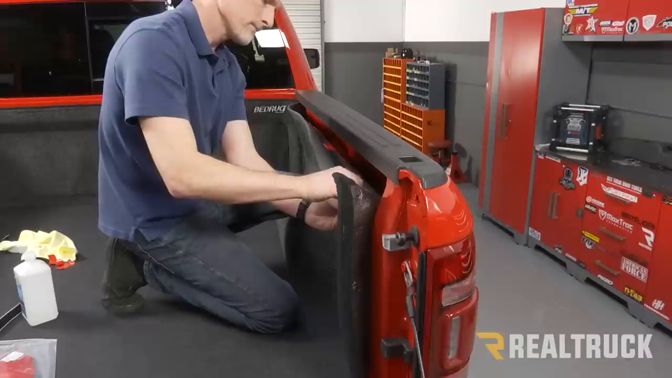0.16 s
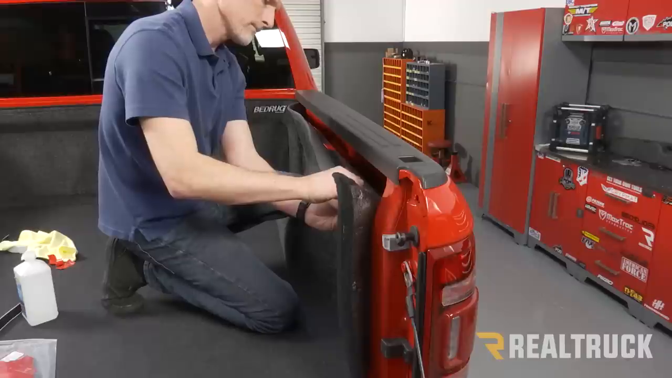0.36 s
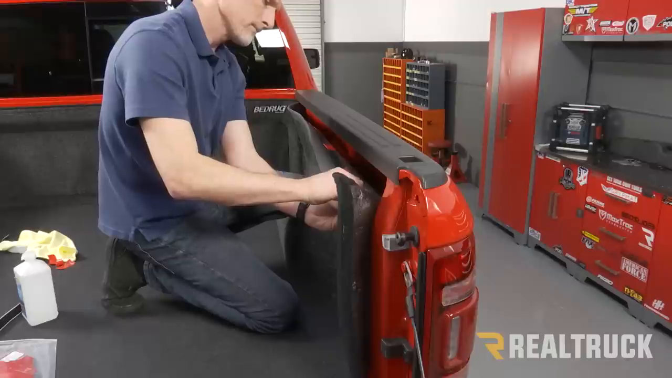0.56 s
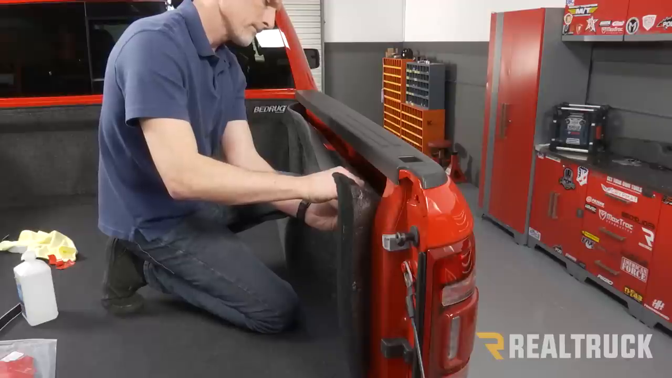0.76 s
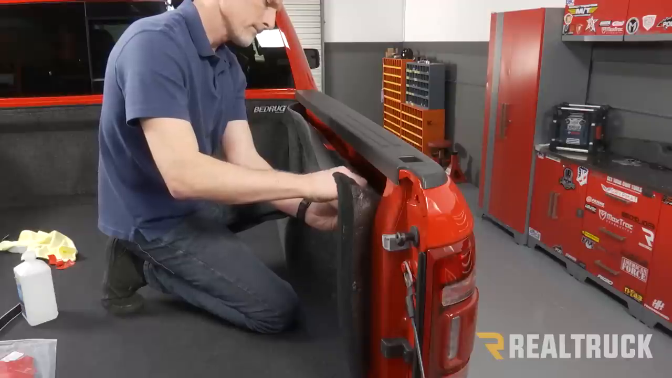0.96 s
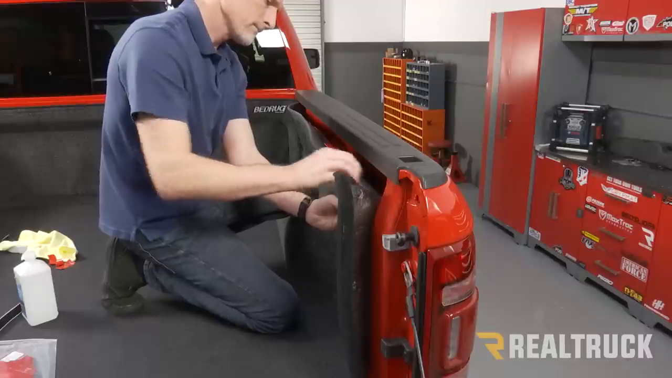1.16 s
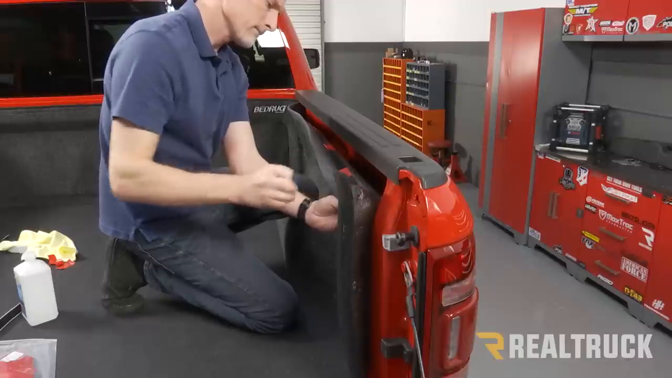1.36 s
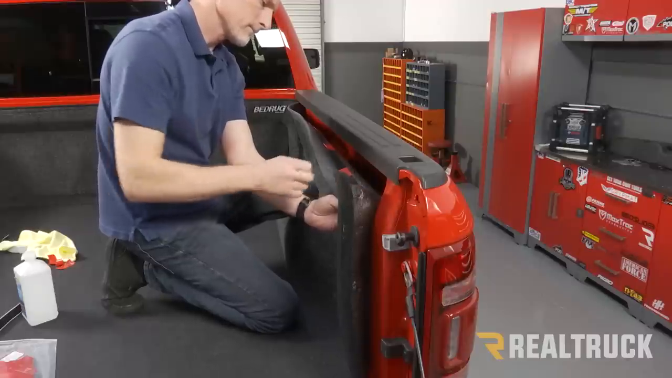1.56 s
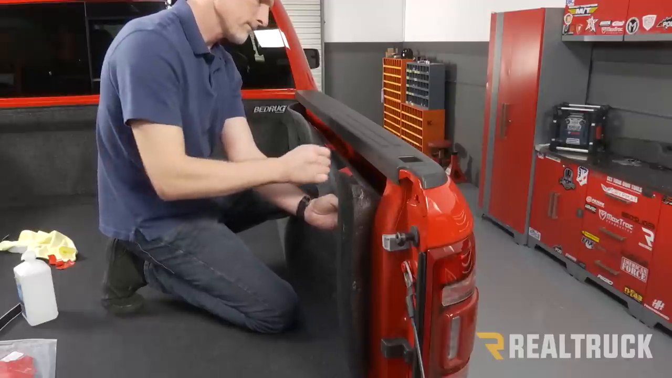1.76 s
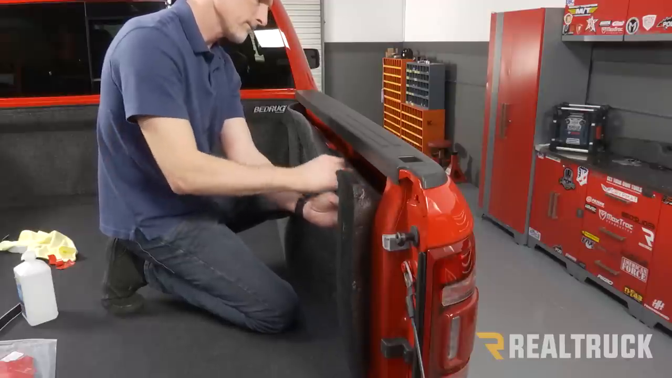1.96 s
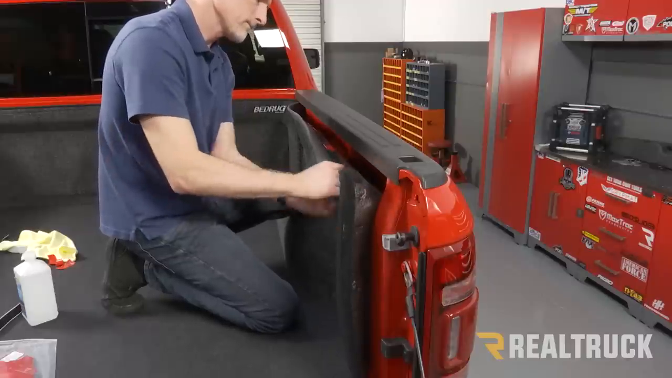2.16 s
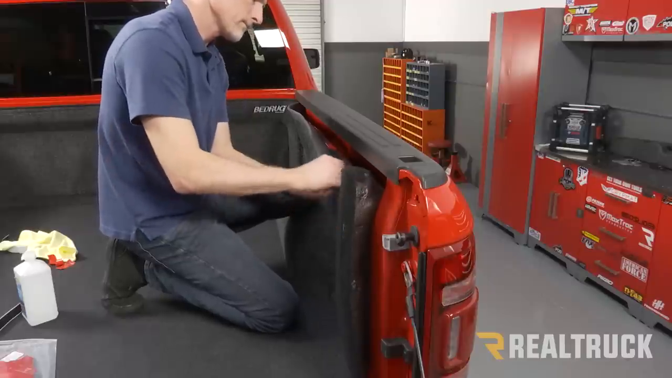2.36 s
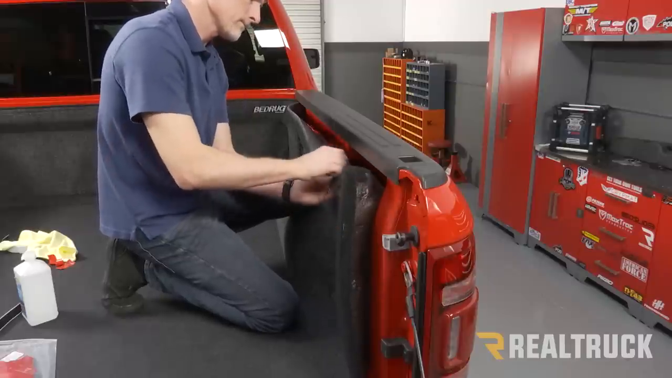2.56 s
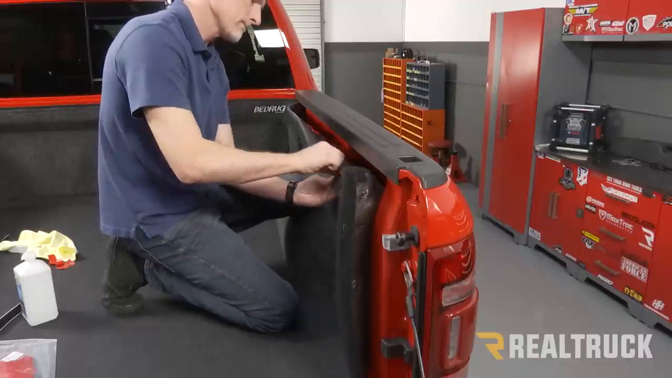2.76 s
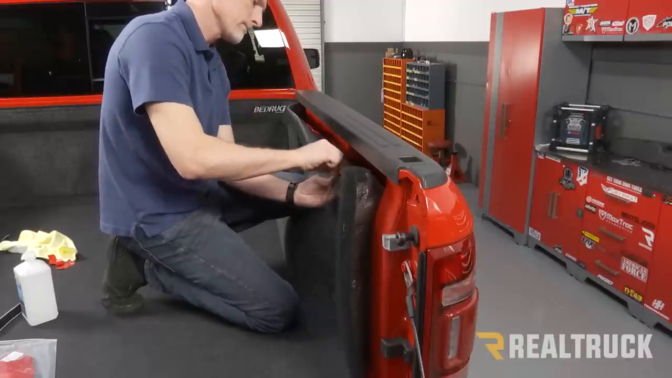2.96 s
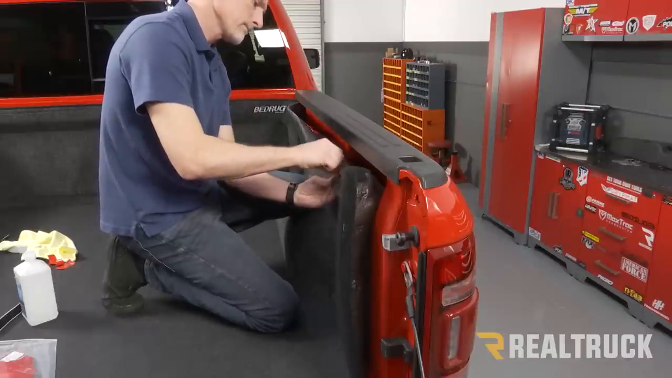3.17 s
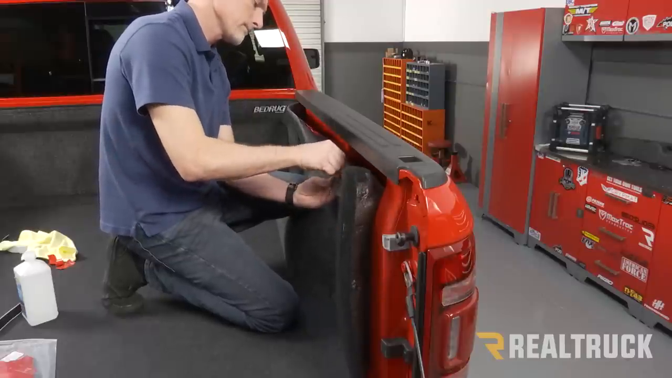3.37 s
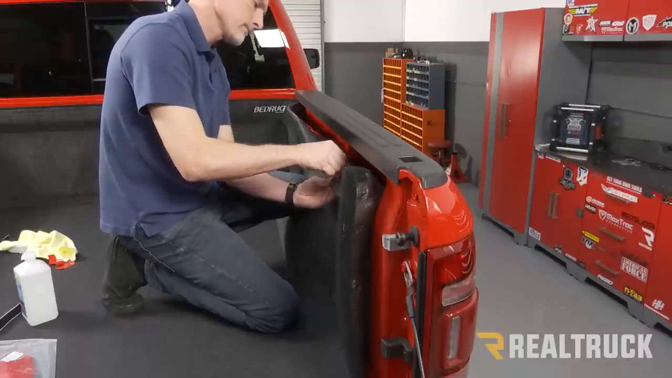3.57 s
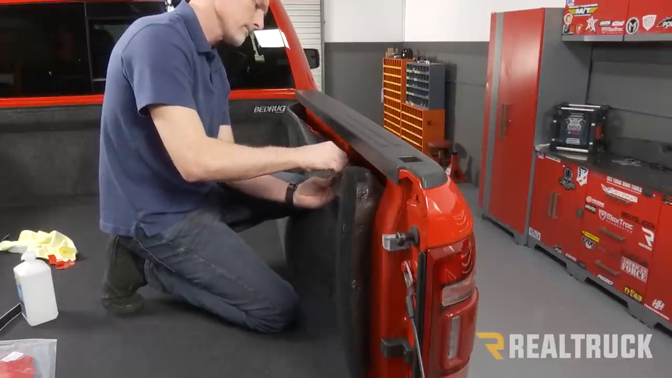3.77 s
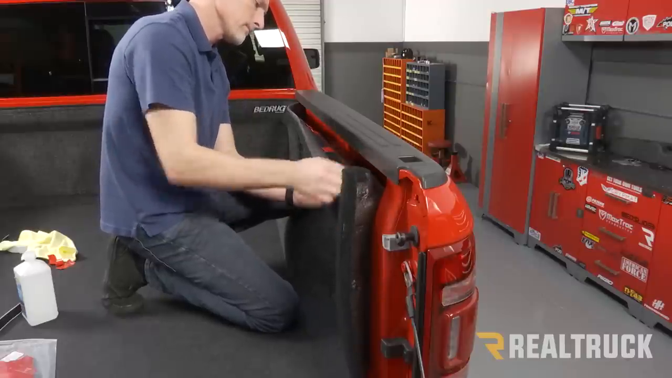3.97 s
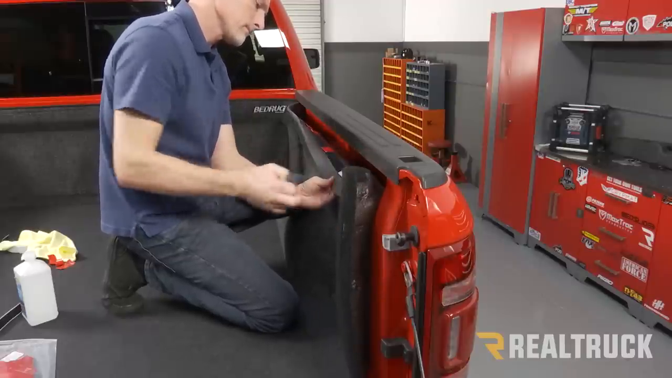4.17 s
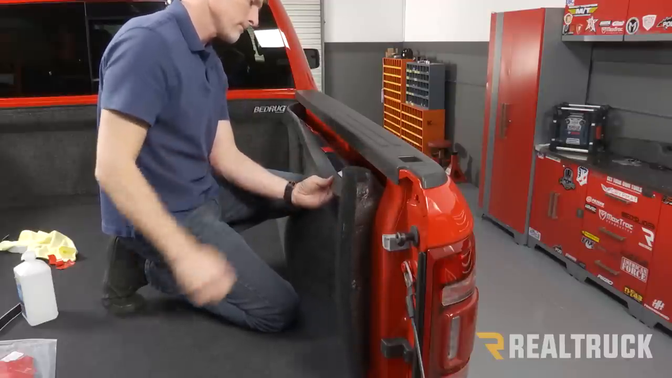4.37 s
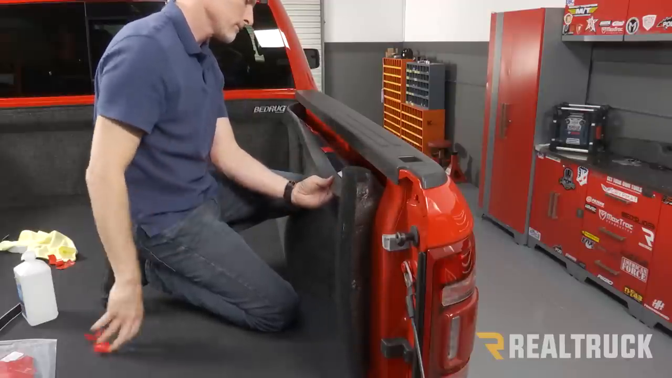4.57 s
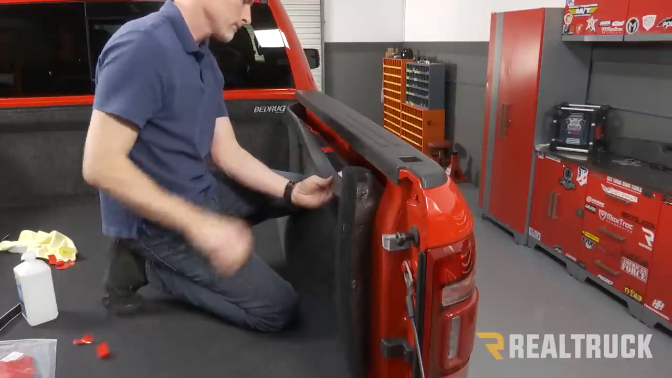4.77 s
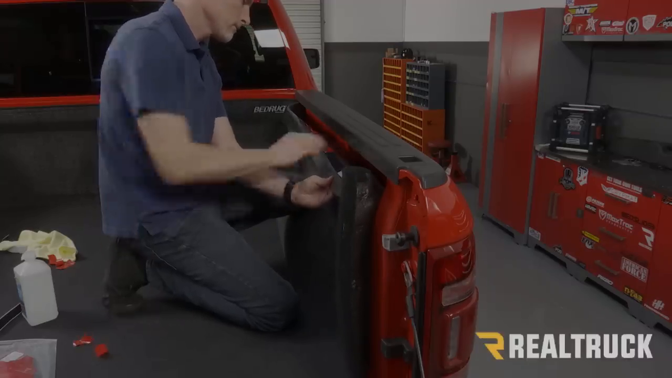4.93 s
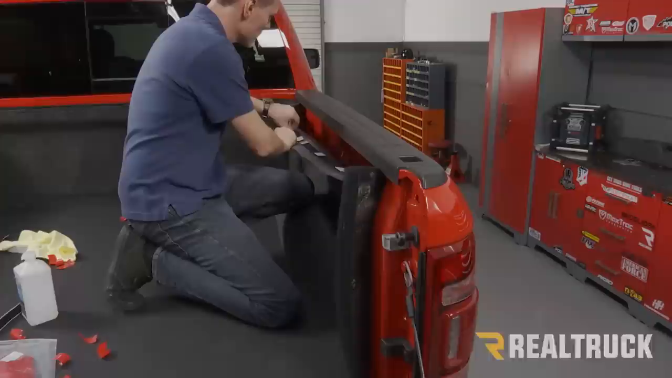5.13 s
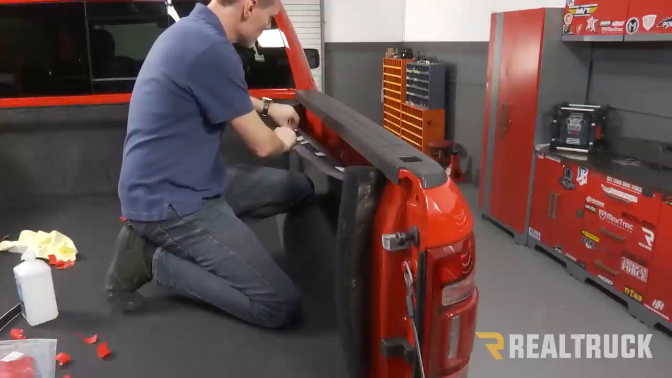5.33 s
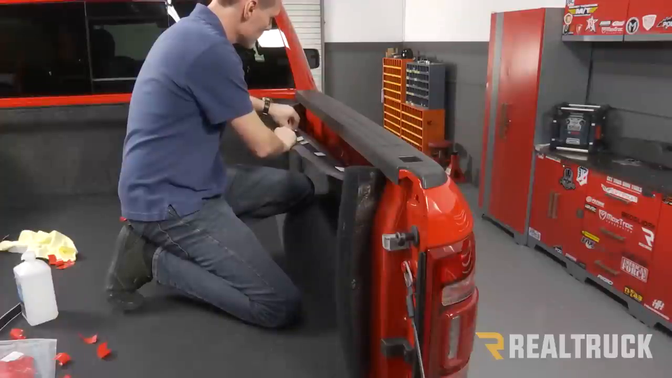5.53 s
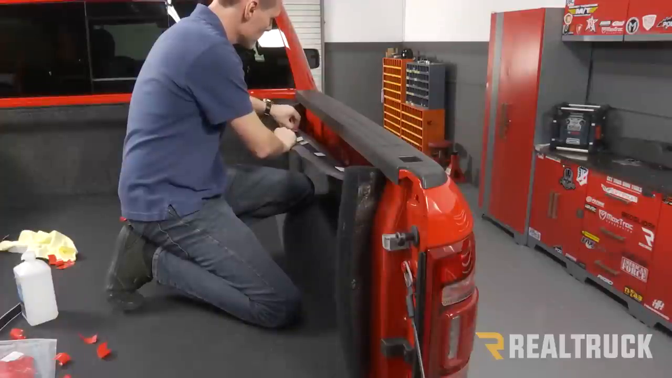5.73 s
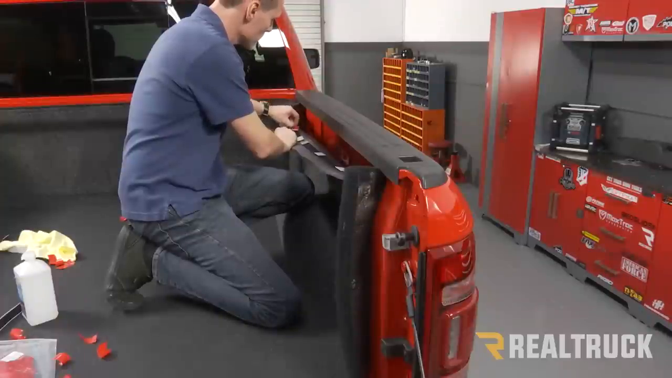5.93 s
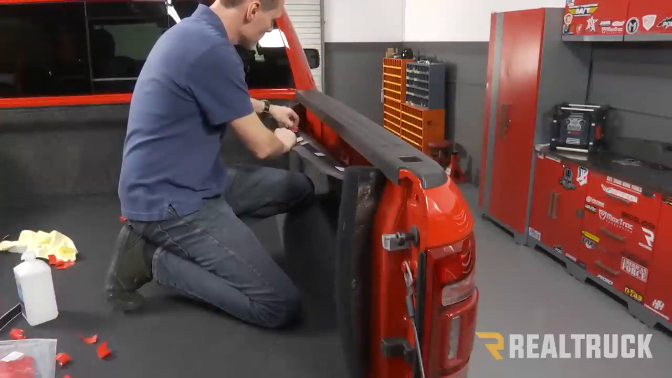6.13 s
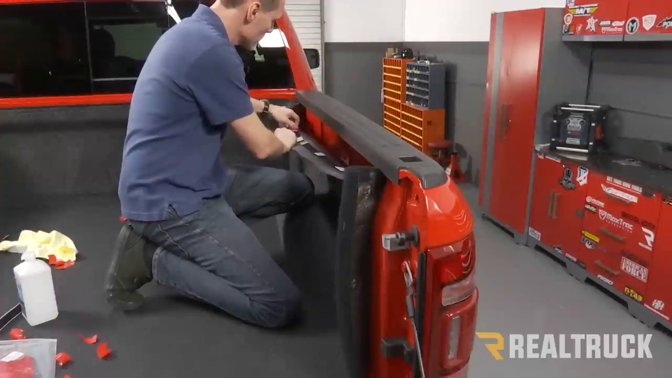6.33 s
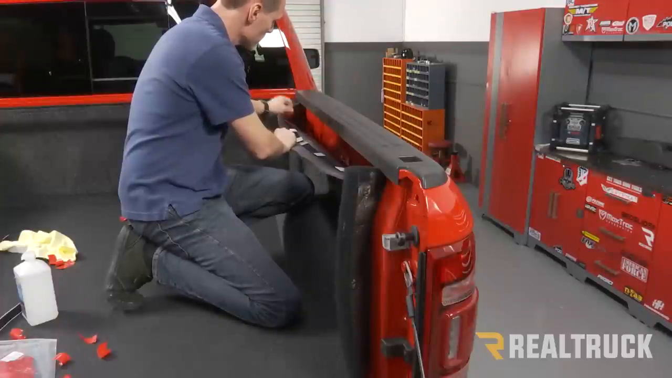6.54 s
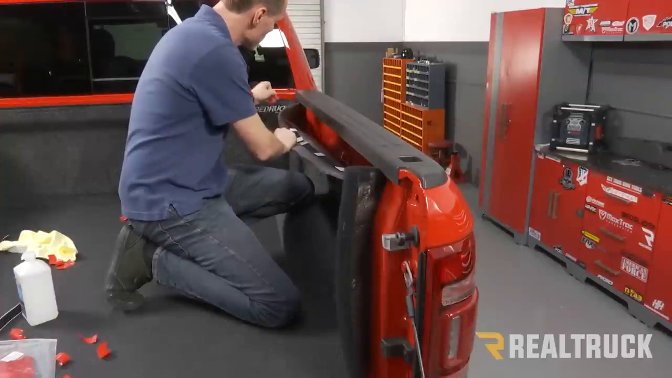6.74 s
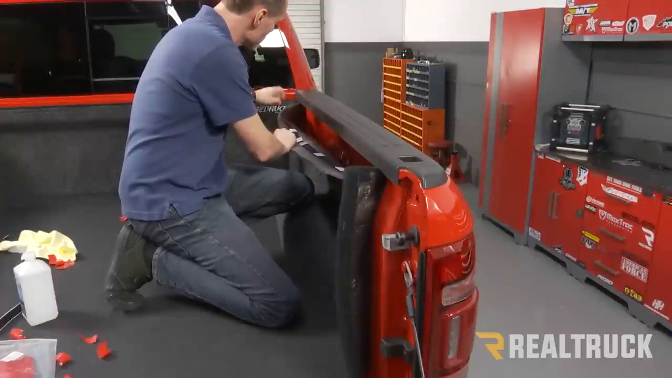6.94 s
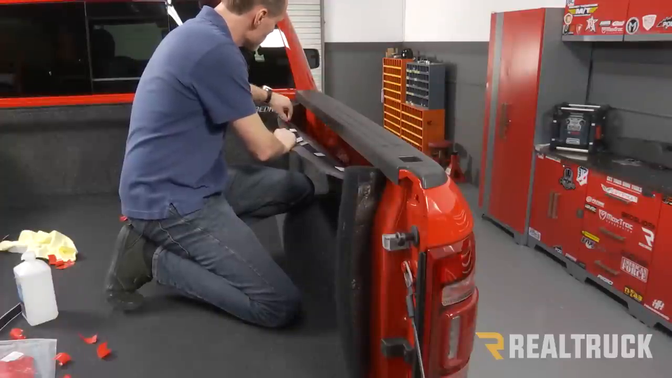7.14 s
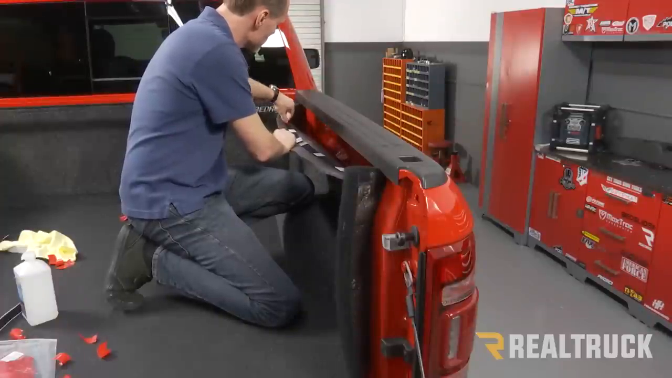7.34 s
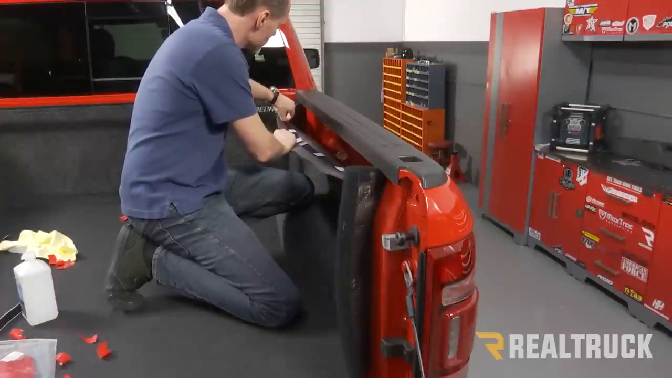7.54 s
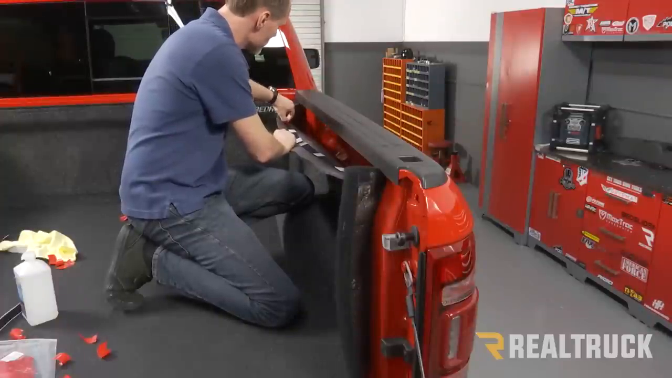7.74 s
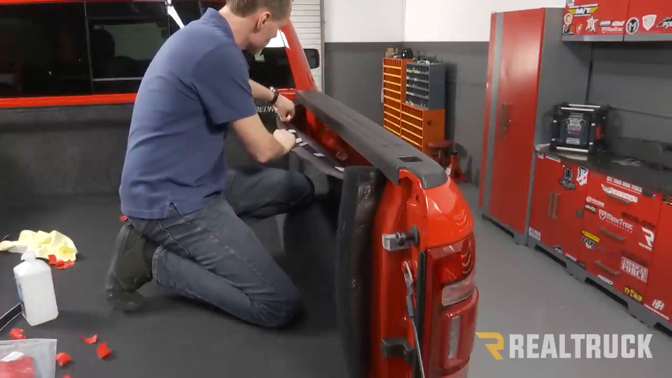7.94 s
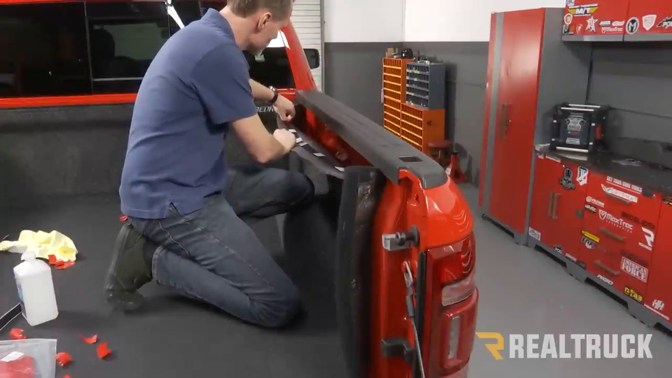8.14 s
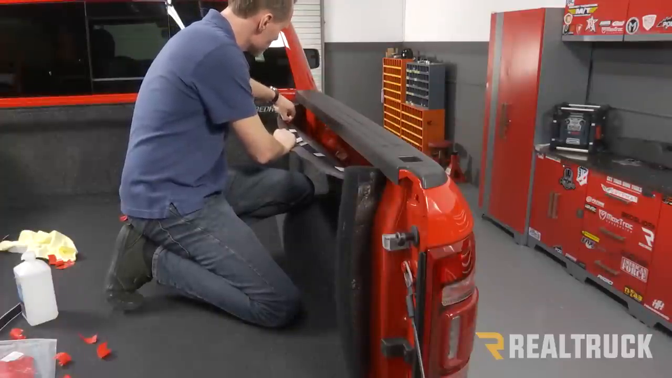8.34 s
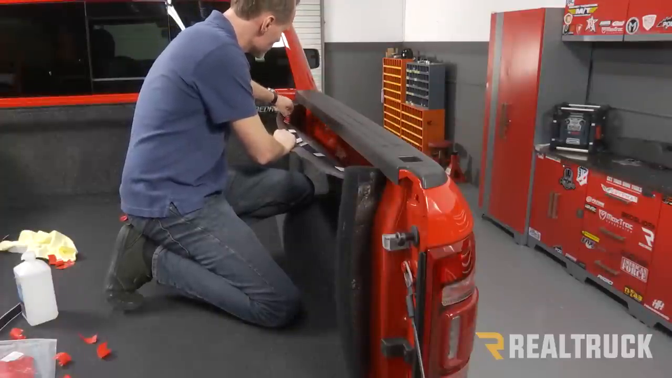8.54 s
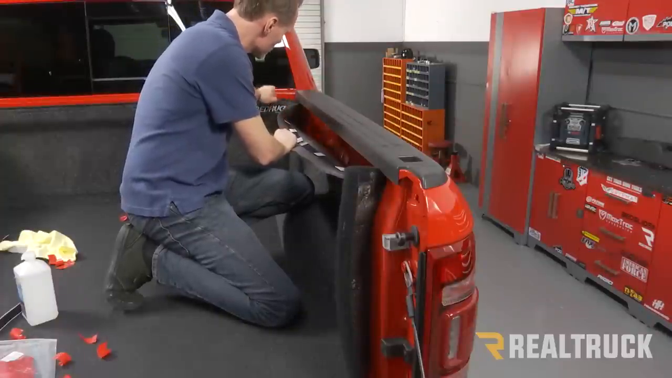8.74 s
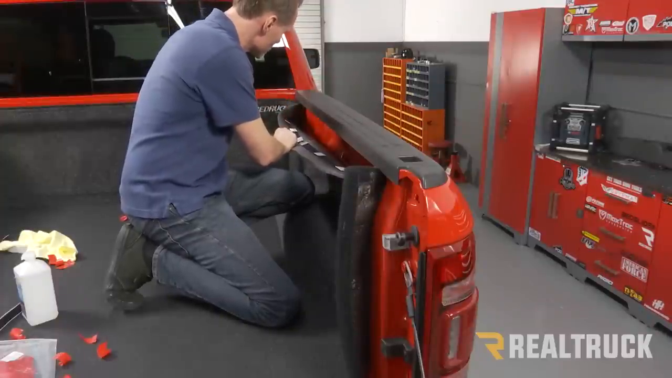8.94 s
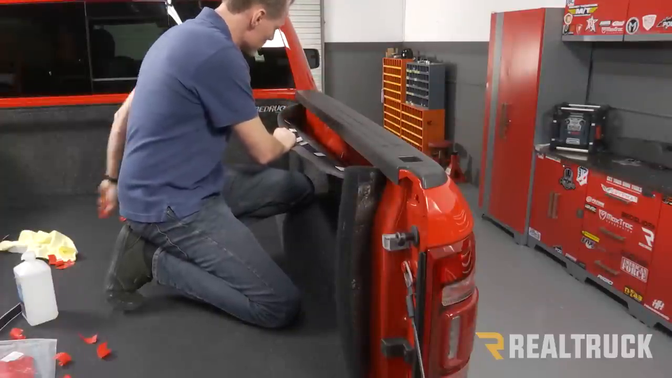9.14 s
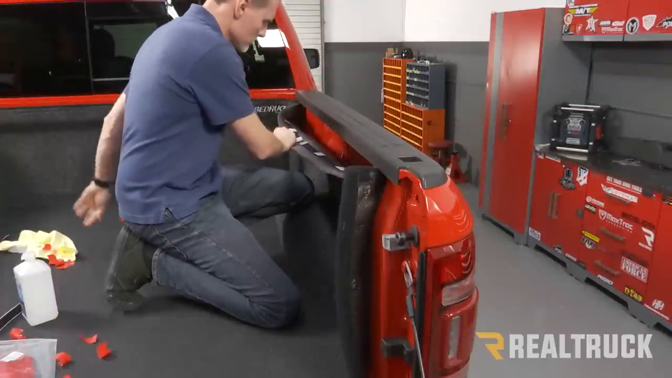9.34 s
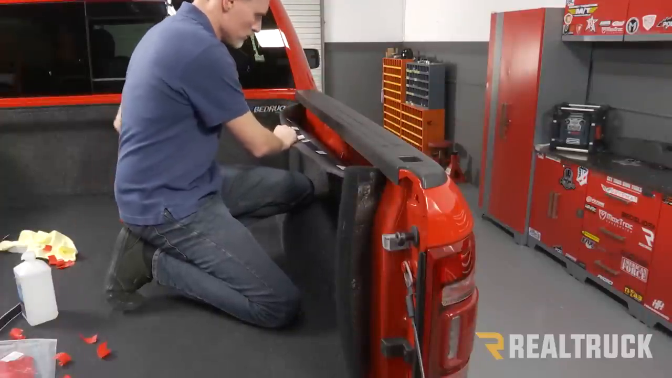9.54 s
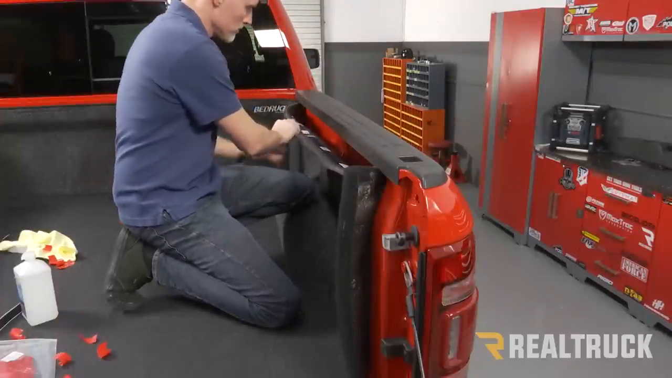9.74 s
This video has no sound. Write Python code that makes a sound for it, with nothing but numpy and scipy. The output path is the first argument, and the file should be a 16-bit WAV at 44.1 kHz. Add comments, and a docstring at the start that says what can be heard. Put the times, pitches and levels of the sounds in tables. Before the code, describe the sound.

Sticky backing film tears away in five short dry rasps, with loose film crackling and sleeves rustling close up in a quiet humming workshop.

```python
"""Close to the microphone in a quiet workshop: a faint crackle and light scuffs, then backing film is torn off
sticky strips, first at 1 s. Loose film crackles and sleeves rustle until the second tear near 4 s; around 5 s
the background rumble and hum change colour. Three more tears follow near 5.7, 6.5 and 8.5 s, then last scuffs.
Tears are stick-slip trains of filtered noise bursts, low one-sided pushes and ringing liner thuds; scuffs are
grainy noise; behind lie shaped noise for rumble, wavering tones for a fan, and a faint room echo."""
import sys
import numpy as np
from scipy import signal
from scipy.fft import rfft, irfft
from scipy.io import wavfile
from scipy.ndimage import uniform_filter1d

SR = 44100
rng = np.random.default_rng(int(sys.argv[2]) if len(sys.argv) > 2 else 0)


def dump(signal):
    """Clip the signal to [-1, 1] and save it as 16-bit WAV at the path in sys.argv[1]."""
    limited = np.clip(np.atleast_2d(signal).T, -1, 1)
    pcm = np.round(limited * 32767).astype(np.int16)
    wavfile.write(sys.argv[1], SR, pcm)


N = 432180

# Glue letting go, close to the microphone.
# Each row: start in seconds, crack level in dB, drumming level in dB, both before the trims in tears().
GLUE_SLIPS = [(1.0497, -33, -33.5), (1.0633, -28, -32), (1.0726, -26, -36), (1.077, -21.5, -23.5),
              (1.0898, -18.5, -23.5), (1.1012, -16, -24), (1.11, -22, -28), (1.1228, -16.5, -21),
              (1.1377, -16, -24), (1.1526, -17, -21.5), (1.1703, -18, -19.5), (1.1834, -15.5, -18.5),
              (1.2004, -17.5, -15.5), (3.8865, -44, -43), (3.8959, -33, -41), (3.9024, -31, -34),
              (3.9093, -28, -41), (3.9137, -44, -42), (3.9174, -25.5, -30), (3.923, -33, -37.5),
              (3.926, -22, -29.5), (3.932, -25, -34), (3.9382, -24, -29.5), (3.9448, -20, -28),
              (3.954, -22, -34), (3.958, -21.5, -34), (3.9639, -23, -34.5), (3.971, -25, -26),
              (3.979, -21.5, -34), (3.9858, -24, -36), (3.993, -25, -31.5), (5.7365, -40.5, -42.5),
              (5.739, -42, -39.5), (5.757, -45, -49), (5.7658, -32.5, -39.5), (5.784, -27.5, -38.5),
              (5.8044, -24.5, -35), (5.8289, -23.5, -34.5), (6.514, -29, -28.5), (6.5278, -25, -32),
              (6.5341, -29, -36), (6.542, -26.5, -53), (6.5498, -27.5, -36.5), (6.557, -30, -32),
              (6.5609, -27.5, -41), (6.5763, -31.5, -42.5), (8.4904, -32, -27.5), (8.496, -40, -32.5),
              (8.501, -28.5, -39), (8.5075, -28, -45), (8.511, -29, -30.5), (8.5313, -22.5, -23.5),
              (8.5444, -26.5, -31), (8.5559, -25.5, -29), (8.5838, -26, -26.5), (8.5926, -31, -32),
              (8.605, -24, -26.5), (8.6196, -26.5, -29.5), (8.6294, -29, -32), (8.6403, -27.5, -33),
              (8.6528, -28, -32), (8.6643, -26.5, -36.5)]
# The freed film during each tear, mostly turning duller and longer as it grows; read between rows.
# Each row: time in seconds, ring in Hz, treble tilt in dB per two octaves, burst length scale in ms.
FREED_FILM = [(1.05, 10100, 11, 1.8), (1.09, 9210, 4, 1.8), (1.12, 5730, -1, 2.2), (1.14, 9200, -1, 2),
              (1.2, 8900, 4.5, 3.7), (3.89, 11100, 13, 2.4), (3.925, 7240, 0, 1.3), (3.95, 10600, 5, 4.1),
              (3.975, 8000, 0.5, 3.1), (4.0, 8500, 9.5, 5.8), (5.74, 11600, 4, 3.4), (5.77, 9000, 4.5, 3),
              (5.831, 5070, -0.5, 2.7), (6.51, 8000, -8, 3), (6.545, 7760, -4, 4), (6.578, 3100, -3, 14),
              (8.49, 10800, 3, 2.9), (8.53, 9000, -1, 1.5), (8.61, 13700, -5.5, 4), (8.64, 4200, -7, 4.9),
              (8.665, 4200, -3.5, 4.6)]
# The colour that every crack shares. Each row: frequency in Hz, gain in dB.
CRACK_COLOUR = [(300, -20), (1000, -11.5), (1700, -4.5), (3000, -1), (4000, -3), (5400, -3.5), (6600, -4.5),
                (9000, -5.5), (12000, -7), (15500, -11.5)]
# The liner under the hand, read between rows.
# Each row: time in seconds, note in Hz, decay time (60 dB) in seconds before each partial takes its share,
# slack flapping against the note in dB.
LINER = [(1.05, 576.5, 0.042, -11.5), (1.201, 595, 0.03, -13.5), (3.89, 419, 0.05, -6),
         (3.93, 625, 0.016, -12), (4.0, 604, 0.032, -9.5), (5.74, 306, 0.023, 3), (6.511, 196, 0.038, 4),
         (6.54, 342, 0.021, 1.5), (6.58, 489, 0.021, 8.5), (8.49, 450, 0.032, -8), (8.58, 471, 0.039, -8),
         (8.66, 550, .04, 1.5)]
# Loose film snapping in the fingers.
# Each row: start in seconds, crack level in dB before the trims in film(), ring in Hz, length scale in ms.
FILM_CRACKLES = [(0.0691, -44, 5300, 2), (1.2524, -36.5, 7800, 6.7), (1.2843, -44, 5700, 4.9),
                 (1.314, -50.5, 3330, 5.4), (1.3693, -49.5, 3020, 2.8), (1.4227, -45.5, 3660, 3.3),
                 (1.4633, -33, 3900, 2.5), (1.5117, -31.5, 4130, 8.9), (1.5143, -35.5, 7040, 4.5),
                 (1.527, -31, 7200, 4.3), (1.566, -43, 9900, 5.4), (1.6247, -31, 14200, 3),
                 (1.63, -40.5, 4340, 2.3), (1.8336, -27.5, 4250, 1.57), (1.8776, -25, 4830, 2.8),
                 (1.895, -46, 4430, 4.8), (2.1155, -53, 5300, 2.4), (2.433, -61, 7800, 2.5),
                 (2.4651, -52.5, 6500, 2.1), (3.2235, -47.5, 3350, 1.5), (3.2311, -38.5, 1590, 1.8),
                 (3.4249, -41, 7870, 1.7), (3.474, -61.5, 9000, 1.5), (3.578, -58, 8000, 1.6),
                 (4.0085, -41, 2956, 3.6), (4.059, -44, 7800, 2.5), (4.0904, -47.5, 4000, 3.4),
                 (4.1307, -47.5, 7600, 3.6), (4.179, -55, 6960, 1.8), (4.211, -59, 3100, 3),
                 (4.229, -55, 7500, 1.8), (4.2986, -39.5, 6400, 1.7), (4.3267, -51, 8860, 3.7),
                 (5.6783, -54.5, 11860, 2.8), (6.1417, -56, 2880, 3), (6.22, -59.5, 4530, 2.1),
                 (6.4334, -50, 9500, 2.8), (6.617, -43.5, 3700, 3.1), (6.684, -52, 3930, 6.3),
                 (6.862, -52, 7300, 3.4), (6.8783, -46, 2970, 6.4), (6.908, -48.5, 2850, 4.3),
                 (6.9277, -49.5, 7500, 4.8), (6.9462, -50, 4180, 4.6), (7.0977, -53, 5570, 4.6),
                 (7.3503, -53, 11600, 3), (8.408, -57.5, 9050, 3.1), (8.45, -48, 5690, 2.6),
                 (8.4673, -51.5, 11740, 4.2), (8.93, -60, 9000, 3), (8.996, -62, 7000, 3.5),
                 (9.475, -47.5, 1720, 6.8)]
# Hands, sleeves and film brushing past.
# Each row: start in seconds, length in ms, hiss level in dB, dull rubbing level in dB, both near mid-stroke.
BRUSHES = [(0.295, 46, -79, -70), (0.6, 27, -84, -71), (1.41, 110, -70, -79), (1.7, 30, -61, -74),
           (1.784, 46, -63.5, -72), (1.851, 64, -60.5, -80), (2.033, 36, -64.5, -60),
           (2.06, 78, -64, -60.5), (2.105, 94, -60, -60.5), (2.191, 94, -60, -66), (2.28, 91, -63.5, -69.5),
           (2.42, 270, -71, -73.5), (2.538, 62, -77.5, -63), (2.709, 88, -75, -80),
           (2.861, 320, -75.5, -75.5), (3.228, 24, -77, -59.5), (3.425, 16, -80, -61),
           (3.871, 13, -72.5, -75), (4.12, 100, -73.5, -84), (4.341, 52, -70.5, -83), (4.43, 63, -75, -77),
           (4.589, 27, -67, -70), (4.65, 21, -75.5, -62), (4.671, 37, -69, -60), (5.054, 36, -63, -62),
           (5.251, 11, -70, -69), (6.22, 68, -73, -77), (6.78, 54, -68.5, -75), (6.861, 77, -66, -90),
           (7.21, 61, -68.5, -73), (7.35, 53, -66.5, -59.5), (7.41, 25, -74.5, -71.5),
           (7.448, 32, -78, -68.5), (7.936, 25, -75, -79), (8.341, 20, -75.5, -73.5),
           (9.17, 210, -75.5, -80.5), (9.472, 47, -66, -62.5), (9.701, 230, -72.5, -74)]
# The strip rustling to rest after each tear.
# Each row: start in seconds, hiss level in dB, dull rubbing level in dB, both near mid-stroke.
STRIP_SETTLES = [(1.21, -71.5, -75), (3.999, -71.5, -78), (5.839, -73, -76), (6.58, -72, -76),
                 (8.674, -71, -69.5)]
# Rumble colour before the change at 5 s. Each row: frequency in Hz, relative level in dB per Hz.
RUMBLE_BEFORE = [(12, -37), (20, -9.5), (53, -3.5), (172, -3), (234, -16.5), (301, -12), (897, -25.5),
                 (1060, -27.5), (1190, -28.5), (11400, -46.5), (16000, -61.5)]
# Rumble colour after the change at 5 s. Each row: frequency in Hz, relative level in dB per Hz.
RUMBLE_AFTER = [(12, -51), (20, -13), (58, 0), (93, -2.5), (216, -7), (285, -16), (499, -17.5),
                (642, -25.5), (802, -26), (11400, -46.5), (16000, -56)]
# The fan hum.
# Each row: note in Hz, width of its wavering in Hz, level before the change at 5 s in dB, level after in dB.
FAN_HUM = [(73.2, 13, -64.5, -64), (174.6, 4.7, -64, -73)]


def tears():
    """Stick-slip peeling: each slip cracks over a low push and drums on the liner."""
    out = np.zeros(N)
    times, *columns = np.transpose(FREED_FILM)
    for s, crack_db, drum_db in GLUE_SLIPS:
        hz, tilt_db, ms = (np.interp(s, times, column) for column in columns)
        # no two slips are quite alike
        ring_draw, tilt_draw, length_draw = rng.standard_normal(3)
        hz = hz * 2 ** (0.13 * ring_draw)  # octaves
        tilt_db = tilt_db + 2.5 * tilt_draw
        ms = ms * 2 ** (0.11 * length_draw)  # octaves
        crack = amp(crack_db - 3.5) * burst(hz, tilt_db, ms, hump_db=5.5, width=0.3)
        push = amp(crack_db - 18.0) * low_push(ms)
        drumming = amp(drum_db + 1.0) * thud(s, spread=0.065)
        add(out, s, crack)
        add(out, s, push + drumming)
    return out


def burst(hz, tilt_db, ms, hump_db, width):
    """A swarm of tiny snaps, starting almost at once and thinning out; its loudest 0.9 ms has power 1."""
    t = np.arange(1024) * 1000 / SR  # ms
    snaps = rng.standard_normal(len(t))
    # each crease rings its own way: an uneven response, 2.7 dB rms
    creases_db = 2.7 * evened(uniform_filter1d(rng.standard_normal(len(t) // 2 + 1), size=24))
    onset = 1 - np.exp(-t / 0.14)
    main_decay = np.exp(-(t / (0.98 * min(ms, 5.5))) ** 1.27)
    swarm = onset * (main_decay + 0.02 * np.exp(-t / 6.1))
    swarm *= 1 + 0.57 * np.exp(-((t - 0.35) / 0.21) ** 2)  # the first threads of glue snap together
    colour_hz, colour_db = np.transpose(CRACK_COLOUR)

    def colour(f):
        """The shared colour, tilted, with a hump where the free film rings."""
        shared = np.interp(np.log(f + 1), np.log(colour_hz), colour_db)
        slope = tilt_db * np.maximum(octaves(f, 6000), -1.6) / 2
        hump = hump_db * np.exp(-(octaves(f, hz) / width) ** 2)
        return shared + slope + hump + creases_db

    # delayed for the filter, then the lead-in is cut off to keep the start sharp
    sound = coloured(np.roll(snaps * swarm, 32), colour)[32:]
    return sound / np.sqrt(uniform_filter1d(sound ** 2, size=40).max())


def low_push(ms):
    """A low one-sided push under each crack, then a slow settling."""
    t = np.arange(3000) * 1000 / SR  # ms
    push = np.exp(-t / (2.7 * ms))
    settling = 0.31 * np.exp(-t / 16.0)
    return (1 - np.exp(-t / 0.4)) * (push + settling)


def thud(s, spread):
    """The liner rings on its note and two other damped partials; its slack part flaps without a note."""
    times, *columns = np.transpose(LINER)
    hz, t60, flap_db = (np.interp(s, times, column) for column in columns)
    t = np.arange(3000) / SR
    draw = rng.standard_normal(6)  # three detunings, three phases
    partials = [(1.0, 3.0, 0.73), (0.78, -2.0, 0.4), (1.5, 0.5, 0.36)]  # (ratio, dB, share of the decay time)
    ring = np.zeros(len(t))
    for k, (ratio, db, share) in enumerate(partials):
        partial_hz = ratio * hz * (1 + spread * draw[k])
        decay = amp(db - 60 * t / (t60 * share))
        ring += decay * np.sin(2 * np.pi * partial_hz * t + draw[k + 3])
    flap = amp(flap_db - 60 * t / 0.05) * band_noise(len(t), 270, 2.9)
    onset = 1 - np.exp(-t / 0.0014)
    return (ring + flap) * onset / np.sqrt(1 + amp(2 * flap_db))


def film():
    """Loose film crackles with a narrower ring and no drumming; faint ticks fall anywhere."""
    out = np.zeros(N)
    faint = []
    for _ in range(30):
        s = rng.random() * N / SR
        crack_db = -65.5 + 4 * rng.standard_normal()
        hz = 8000 * 2 ** (rng.random() - 0.5)
        faint.append((s, crack_db, hz, 1.8))
    for s, crack_db, hz, ms in list(FILM_CRACKLES) + faint:
        tilt_db = -2 + 6.5 * octaves(hz, 6200)  # higher rings are brighter
        add(out, s, amp(crack_db - 4.0) * burst(hz, tilt_db, ms, hump_db=11.5, width=0.21))
        add(out, s, amp(crack_db - 16.0) * low_push(ms))
    return out


def rustle():
    """Scuffs take colour and fade from how heavy the rubbing is against the hiss; strips settle after tears."""
    out = np.zeros(N)
    for s, ms, hiss_db, rub_db in BRUSHES:
        weight_db = rub_db - hiss_db
        hz = 5200 * 2 ** (0.04 * weight_db)  # centre of the hiss
        fade_db = 4.5 + 0.85 * weight_db  # heavy rubbing is a bump that fades fast; the lightest swells
        add(out, s, scuff(s, ms, hiss_db, rub_db, hz, fade_db))
    for s, hiss_db, rub_db in STRIP_SETTLES:
        add(out, s, scuff(s, 190, hiss_db, rub_db, hz=4300, fade_db=21.5))
    return out


def scuff(s, ms, hiss_db, rub_db, hz, fade_db):
    """Grainy, patchy hiss over dull rubbing; one that fades fast also starts fast."""
    u = np.arange(13056) * 1000 / SR / ms  # time in stroke lengths
    grains = amp(2.0 * evened(uniform_filter1d(rng.standard_normal(len(u)), size=60)))
    rise = 1 - np.exp(-u * (12.0 + 2.5 * max(fade_db, 0)))
    ending = np.exp(-u ** 4)
    stroke = rise * amp(fade_db * (0.5 - u)) * ending
    hiss = patchy(band_noise(len(u), hz, 2.1) * grains, patch_db=3.0)
    rubbing = band_noise(len(u), 490, 4.5)
    sound = stroke * (amp(hiss_db) * hiss + amp(rub_db) * rubbing)
    # the first touch knocks the liner
    add(sound, 0, amp(rub_db + 0.64 * fade_db + 2.5) * thud(s, spread=0.15))
    return sound


def patchy(x, patch_db):
    """Lets patches of about 20 ms by 1.7 kHz swell and sink."""
    z = signal.stft(x, nperseg=256)[2]
    patches = uniform_filter1d(rng.standard_normal(z.shape), size=10, axis=0)  # across frequency
    patches = uniform_filter1d(patches, size=7, axis=1)  # along time
    return evened(signal.istft(z * amp(patch_db * evened(patches)), nperseg=256)[1][:len(x)])


def background():
    """Room rumble and fan hum behind the close sounds; their colour changes around 5 s."""
    later = np.interp(np.arange(N) / SR, (4.9, 5.31), [0, 1])  # the change, in seconds
    return rumble(later) + fan_hum(later)


def rumble(later):
    """Noise in two colours, crossfaded at constant power."""
    out = np.zeros(N)
    for points, db, share in ((RUMBLE_BEFORE, -58.5, 1 - later), (RUMBLE_AFTER, -59.5, later)):
        hz, level_db = np.transpose(points)
        noise = coloured(rng.standard_normal(N), lambda f: np.interp(np.log(f + 1), np.log(hz + 1), level_db))
        out += amp(db) * np.sqrt(share) * evened(noise)
    return out


def fan_hum(later):
    """Each hum is narrow noise that wavers over a steady blade note."""
    out = np.zeros(N)
    for hz, width, before_db, after_db in FAN_HUM:
        wavering = coloured(rng.standard_normal(N), lambda f: -20 * np.log10(1 + (2 * (f - hz) / width) ** 2))
        steady = np.sin(2 * np.pi * (hz * np.arange(N) / SR + rng.random()))
        level = amp(before_db + later * (after_db - before_db))
        out += level * evened(evened(wavering) + 3.7 / width * steady)  # narrower hums are steadier
    return out


def workshop(x):
    """Sparse echoes of random sign with a faint long tail; treble dies sooner."""
    taps = np.zeros(SR)
    at = np.arange(200, len(taps) - 20, 20)
    taps[at + rng.integers(0, 20, len(at))] = rng.choice([-1.0, 1.0], len(at))
    hz, t, z = signal.stft(taps, SR, nperseg=256)
    t60 = np.interp(np.log(hz + 1), np.log([300, 3000, 15000]), [0.35, 0.3, 0.15])[:, None]  # s
    near_walls = amp(-60 * t / t60)
    far_hall = amp(-13.0 - 60 * t / (3.2 * t60))
    tail = signal.istft(z * (near_walls + far_hall), SR, nperseg=256)[1]
    return signal.oaconvolve(x, tail / np.linalg.norm(tail))[:N]


def amp(db):
    """Decibels to gain."""
    return 10 ** (np.asarray(db) / 20)


def evened(x):
    """Scales to rms 1."""
    return x / np.sqrt(np.mean(x ** 2) + 1e-20)


def add(mix, s, sound):
    """Mixes a sound in at s seconds."""
    part = mix[round(s * SR):][:len(sound)]
    part += sound[:len(part)]


def octaves(hz, centre_hz):
    """Distance in octaves; the added 1 Hz keeps zero finite."""
    return np.log2((hz + 1) / centre_hz)


def coloured(x, db_of):
    """Filters x by a gain in dB given as a function of frequency."""
    return irfft(rfft(x) * amp(db_of(np.fft.rfftfreq(len(x), 1 / SR))), len(x))


def band_noise(size, centre_hz, slope_db):
    """Noise that falls by slope_db an octave squared around its centre and levels out far below it."""
    def colour(hz):
        """The fall in dB."""
        return -slope_db * np.maximum(octaves(hz, centre_hz), -1.4) ** 2
    return evened(coloured(rng.standard_normal(size), colour))


def scene():
    """Tears, crackles and scuffs close by, a little of the room on them, over the background."""
    close = tears() + film() + rustle()
    return (close + amp(-24.5) * workshop(close) + background())[None]


def record(dry):
    """The microphone: a gentle bass cut at 22 Hz, then a band limit at 15.6 kHz."""
    bass_cut = signal.butter(1, 22, "highpass", fs=SR, output="sos")
    band_limit = signal.firwin(255, 15600, window=("kaiser", 8), fs=SR)
    return signal.oaconvolve(signal.sosfilt(bass_cut, dry), band_limit[None], "same")


dry = scene()
out = record(dry)
dump(out)
```